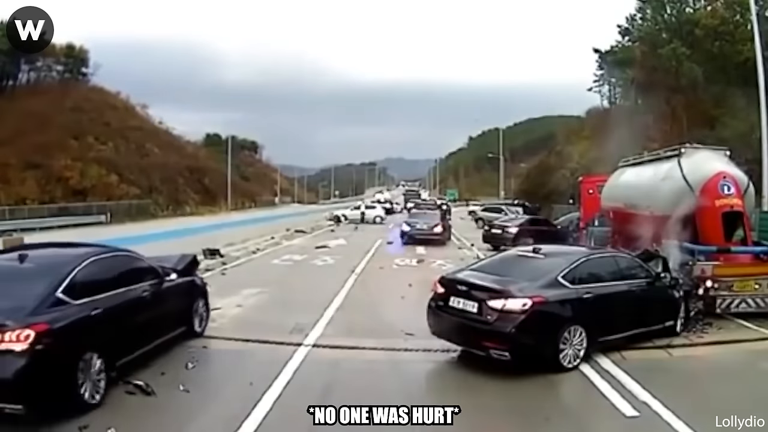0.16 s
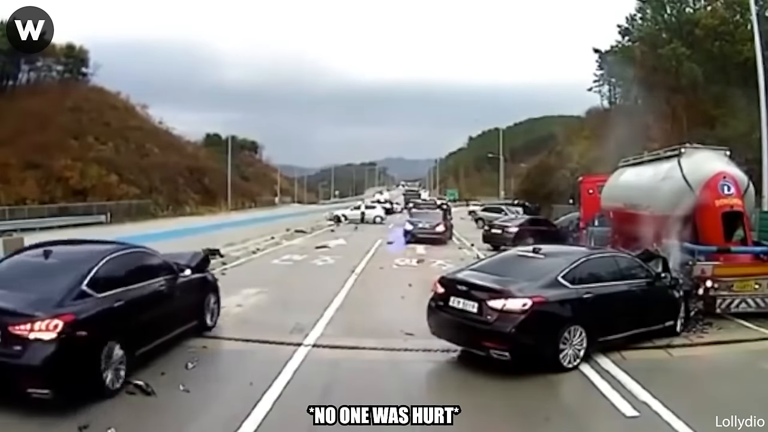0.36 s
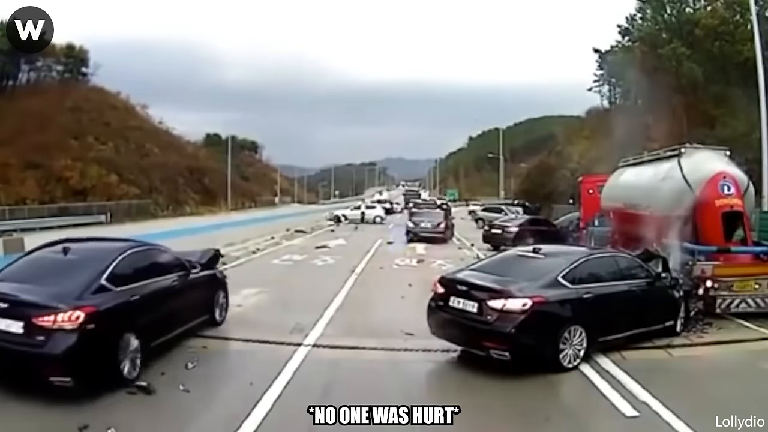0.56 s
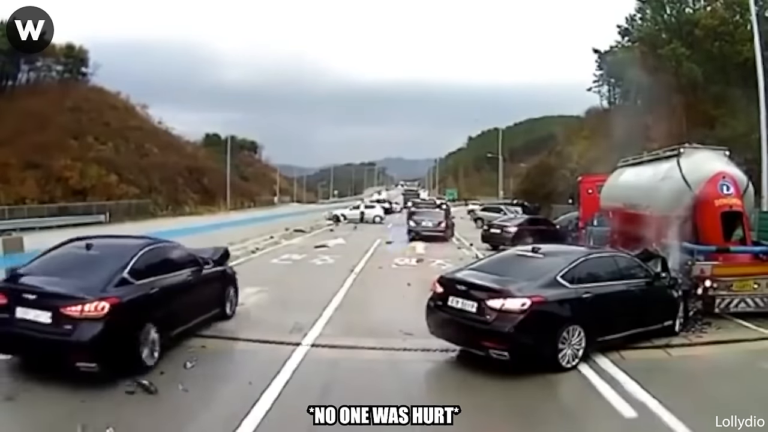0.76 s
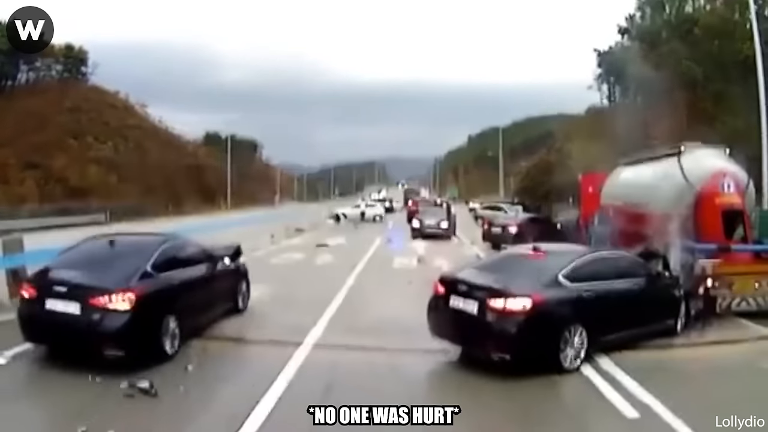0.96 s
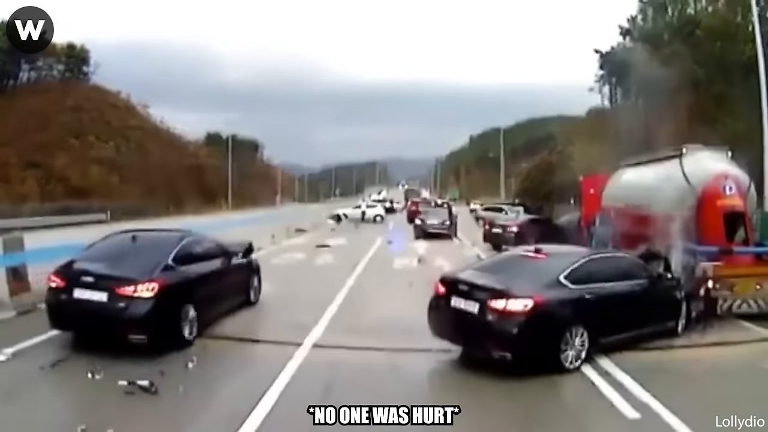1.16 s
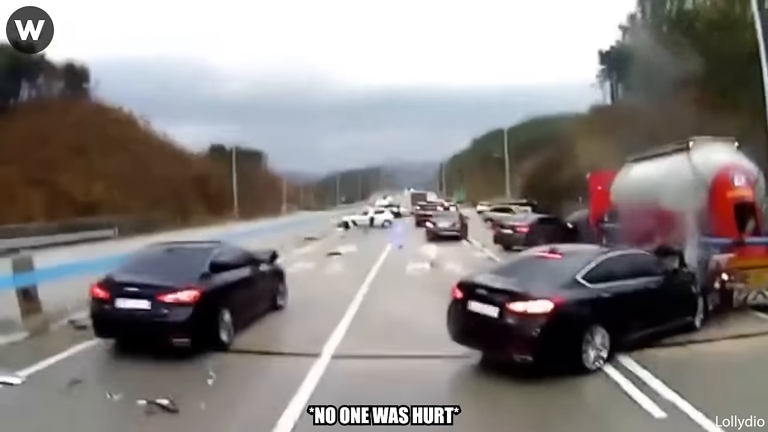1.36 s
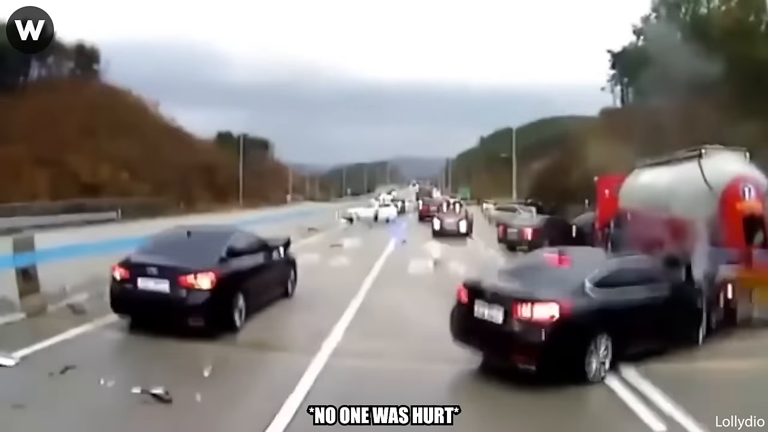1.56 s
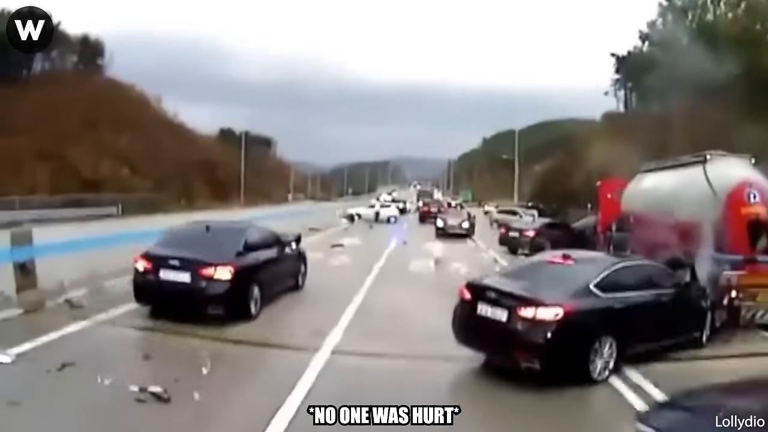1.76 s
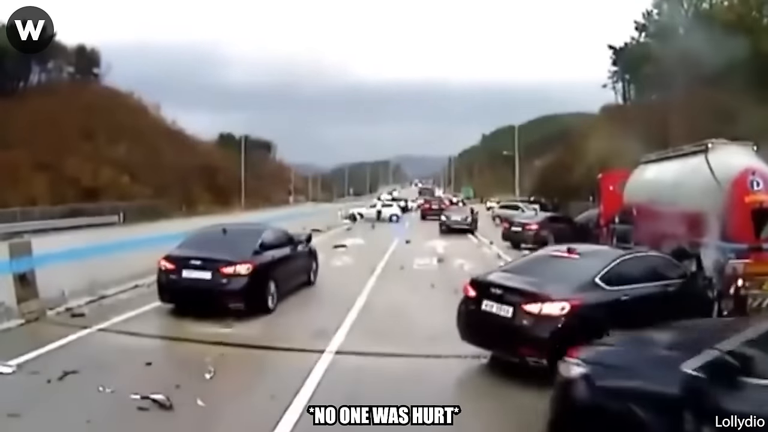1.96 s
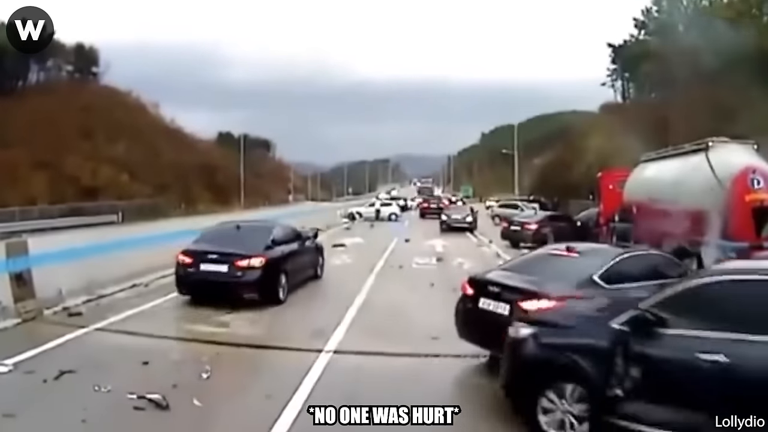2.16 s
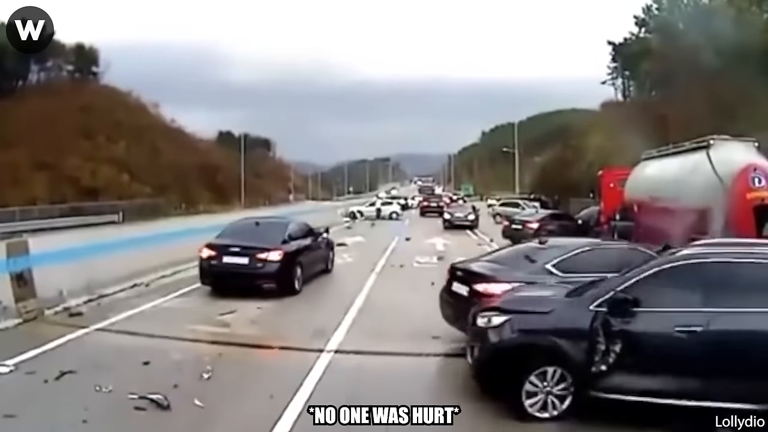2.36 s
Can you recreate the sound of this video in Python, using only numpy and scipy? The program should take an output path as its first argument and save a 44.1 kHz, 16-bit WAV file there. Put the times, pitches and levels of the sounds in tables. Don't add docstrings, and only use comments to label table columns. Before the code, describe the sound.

Loud tyre screech on an open highway, rough and unsteady with a low howl beneath, weakens before a sudden crash of booming body panels, breaking glass and ringing debris; close single microphone, faint ambience, short echoes.

```python
import sys
import numpy as np
from scipy import signal
from scipy.io import wavfile
from scipy.ndimage import uniform_filter1d

SR = 44100
rng = np.random.default_rng(int(sys.argv[2]) if len(sys.argv) > 2 else 0)


def convert_level_to_amplitude(level_db):
    exponent = np.asarray(level_db, float) / 20
    return 10 ** exponent


def dump_mix(stems):
    frames = np.atleast_2d(stems).T
    limited = np.clip(frames, -1, 1)
    pcm = np.round(limited * 32767).astype(np.int16)
    wavfile.write(sys.argv[1], SR, pcm)


N = 110250
T = np.arange(N) / SR

# (frequency [Hz], density [dB/Hz])
FLOOR_COLOUR = [(30, -2.5), (80, -20.5), (150, -24.5), (1000, -35.5), (7000, -40.5), (8500, -61),
                (14000, -50)]
FLOOR_DB = -52
# (frequency [Hz], level [dB], t60 [s])
TICK_MODES = [(3134, 1.5, 0.051), (3372, 0.5, 0.065), (1220, -11.5, 0.082), (5200, -10, 0.033),
              (10800, 2, 0.022)]
TICK_S, TICK_DB = .0474, -29.5
TICK_BOUNCE_S, TICK_BOUNCE_DB = .0038, -3.5
TICK_RATTLE_DB, TICK_RATTLE_T60_S = -56, .049
# (time [s], level [dB], brightness [dB/octave], rumble [dB])
SCRUB = [(.085, -39, -1, 0), (.11, -25, -2, 1), (.25, -23, 0.5, 2), (.38, -24, 0, 1), (.55, -22.5, 0, -1.5),
         (.83, -25.5, 2, 4.5), (1.05, -19.5, -2, 0), (1.12, -21, -2, -10), (1.3, -28.5, 0, 2.5),
         (1.5, -27, -1.5, -1), (1.58, -30, -3, -16), (1.64, -30, -12.5, 0.5), (1.7, -39, -10, 4)]
# (frequency [Hz], density [dB/Hz])
SCRUB_COLOUR = [(40, -15), (120, -1.5), (350, -5), (800, 4.5), (2200, -1), (4000, -6.5), (7400, -23.5),
                (8600, -44)]
# (time [s], slip rate [Hz], level [dB])
SQUEAL = [(.085, 857.6, -64), (.135, 947.3, -44), (.27, 1096, -22), (.3, 1119, -27), (.35, 1039, -26.5),
          (.39, 1030, -29.5), (.45, 1090, -23), (.53, 1059, -46), (.63, 983.6, -27.5), (.69, 930, -37),
          (.76, 970, -21.5), (.82, 980, -36), (.87, 984, -23.5), (.94, 930, -28), (1.0, 900, -29),
          (1.07, 884.5, -27), (1.12, 954, -25), (1.165, 810.6, -29), (1.2, 992, -25.5),
          (1.26, 949.6, -21.5), (1.31, 905, -28), (1.38, 930, -23), (1.44, 946.4, -26), (1.5, 888, -29),
          (1.55, 855, -23.5), (1.61, 840, -27), (1.645, 867, -39)]
# (time [s], pitch [Hz], level [dB])
SCREECH = [(.088, 1605, -43), (.1, 1639, -23.5), (.121, 1436, -21.5), (.129, 1950, -25), (.19, 1950, -29),
           (.25, 1854, -27.5), (.33, 1880, -35), (.39, 1684, -34), (.46, 1780, -26.5), (.49, 1870, -25.5),
           (.56, 1703, -35), (.61, 1770, -45), (.68, 1826, -32), (.77, 1890, -28.5), (.87, 1913, -29),
           (.97, 1843, -29), (1.03, 1772, -29), (1.1, 1710, -27), (1.15, 1769, -19), (1.2, 1797, -32),
           (1.26, 1851, -28), (1.34, 1798, -26), (1.42, 1800, -36.5), (1.48, 1742, -25.5),
           (1.54, 1821, -25.5), (1.6, 1780, -26), (1.64, 1790, -55)]
# (time [s], pitch [Hz], level [dB])
WHINE = [(.1, 2110, -50), (.15, 2147, -33), (.23, 2162, -26.5), (.28, 2315, -30), (.35, 2240, -38),
         (.45, 2177, -36), (.55, 2044, -39), (.62, 2080, -30), (.72, 2035, -28), (.77, 2001, -34),
         (.85, 2202, -19.5), (.89, 2074, -38), (.93, 2015, -27), (1.0, 1960, -36), (1.1, 1950, -31),
         (1.21, 2030, -26), (1.27, 1960, -29.5), (1.33, 2097, -22), (1.39, 2090, -30), (1.44, 2011, -22.5),
         (1.5, 1933, -28), (1.55, 1890, -30), (1.62, 1842, -42)]
# (time [s], pitch [Hz], level [dB])
HOWL = [(.089, 760, -36.5), (.105, 720, -17), (.125, 616.3, -18.5), (.24, 569.1, -19.5), (.37, 591.6, -18),
        (.405, 566, -28), (.52, 575, -28), (.58, 584, -19), (.70, 566.6, -24.5), (.84, 595, -20),
        (.88, 593.6, -30.5), (.95, 555, -27.5), (1.02, 510, -30), (1.17, 560, -40), (1.26, 559, -28),
        (1.37, 560.9, -28.5), (1.41, 544, -35), (1.58, 573, -37.5), (1.64, 571.7, -44.5)]
TAIL_DB_PER_S = 30
HOWL_BREAKS_S = .87
SETTLES_S = 1.3
# (from [s], to [s])
SPREAD = [
    (.09, 0.17),
    (.24, 1.49),
    (1.715, 2.6),
]
SPREAD_LOW_HZ, SPREAD_HIGH_HZ, SPREAD_DB = 4410, 7460, -2
# (delay [s], level [dB])
ECHOES = [(.019, -16.5), (.041, -13.5), (.083, -23)]
# (time [s], level [dB], brightness [dB/octave], rumble [dB])
CRUSH = [(1.713, -20.5, -1.5, -36), (1.76, -17.5, -1.5, -27), (1.82, -21, -1, -6), (1.832, -18, 2, -11),
         (1.92, -18, 1.5, 6), (2.0, -20, 2, 9), (2.1, -22, 1.5, 5), (2.17, -19.5, 0, 5),
         (2.3, -22, 2.5, 10), (2.5, -22, 0.5, 7)]
# (frequency [Hz], density [dB/Hz])
CRUSH_COLOUR = [(40, -29), (105, -13), (200, -3.5), (550, -3), (1200, -7), (2100, -10.5), (5700, -20),
                (10500, -37)]
CRUSH_ATTACK_S = .0015
# (frequency [Hz], level [dB], t60 [s])
PANELS = [(105, -6, 0.19), (180, 5, 0.1), (345, -5.5, 0.33), (724, -2, 0.096)]
PANEL_DB, BUCKLES_PER_S = -32, 700
# (time [s], frequency [Hz], peak [dB], t60 [s])
BOOMS = [(1.73, 184.6, -23, 0.14), (1.74, 367.5, -24, 0.13), (1.775, 388, -23, .2), (1.78, 233, -19, .15),
         (1.815, 467, -14, .1), (1.82, 705, -17, .1), (1.85, 180, -20.5, 0.14), (1.895, 277, -24, 0.1),
         (1.9, 424, -36, 0.057), (1.94, 183.4, -22, 0.1), (1.975, 830, -19.5, 0.17),
         (2.02, 196.7, -21.5, 0.12), (2.02, 345, -20.5, .1), (2.15, 240, -16, 0.099),
         (2.18, 318, -20.5, .2), (2.28, 210, -24, 0.12), (2.345, 203.7, -19, 0.17), (2.37, 398, -22.5, 0.2),
         (2.45, 330, -20, .15)]
# (time [s], level [dB])
SHATTER = [(1.715, -64.5), (1.81, -40.5), (1.835, -39.5), (1.92, -39), (2.0, -47), (2.09, -13.5),
           (2.14, -30), (2.32, -17), (2.4, -45), (2.5, -29)]
SHARDS_PER_S, SHARD_CYCLES = 1200, 150.0
# (time [s], pitch [Hz], peak [dB], t60 [s])
PIECES = [(1.85, 3780, -14, 0.056), (1.9, 2290, -16, 0.098), (1.975, 3390, -15.5, 0.086),
          (1.975, 2890, -14.5, 0.055), (2.005, 2840, -24, 0.052), (1.985, 5700, -18, .1),
          (2.012, 5713, -13.5, 0.044), (2.03, 2065, -18.5, 0.22), (2.065, 2064, -19, .07),
          (2.095, 6380, -22.5, 0.054), (2.175, 2682, -16, 0.065), (2.228, 2720, -16, 0.06),
          (2.246, 4900, -20, 0.079), (2.255, 2288, -22, .1), (2.28, 1984, -17, 0.064),
          (2.31, 1942, -17, 0.07), (2.318, 4930, -24, 0.18), (2.345, 3690, -21.5, 0.065),
          (2.4, 2280, -26, .07)]
SNAP_S, SNAP_DB = 2.117, -40
DEEP_HZ = 170
CUTOFF_HZ, AIR_DB, HISS_DB, SWAY_DB, DC_OFFSET = 10050, -19.5, -66.5, -51.5, .011


def rms_one(x):
    return x / np.sqrt(np.mean(x ** 2) + 1e-20)


def bandpass(x, low_hz, high_hz, order=2):
    return signal.sosfilt(signal.butter(order, [low_hz, high_hz], "band", fs=SR, output="sos"), x)


def in_time(rows):
    s, *columns = np.transpose(rows)
    return [np.interp(T, s, c) for c in columns]


def drift(rate_hz):
    r = np.exp(-16 * np.pi * rate_hz / SR)
    slow = signal.lfilter([1], [1, -2 * r, r * r], rng.standard_normal(N // 8 + 8002))
    slow = slow[8000:]
    return np.interp(np.arange(N) / 8, np.arange(len(slow)), rms_one(slow - slow.mean()))


def ring(push, hz, t60_s):
    r = convert_level_to_amplitude(-60 / (t60_s * SR))
    w = 2 * np.pi * hz / SR
    return signal.lfilter([0, np.sin(w)], [1, -2 * r * np.cos(w), r * r], push + 1e-18)


def clicks(per_s, uneven_db):
    size = convert_level_to_amplitude(uneven_db * np.minimum(rng.exponential(1, N), 5))
    sign = rng.choice([-1, 1], N)
    return size * sign * (rng.random(N) < per_s / SR)


def struck(rows, contact_s):
    out = 0
    for s, hz, peak_db, t60_s in rows:
        bump = np.exp(-((T - s - contact_s) / contact_s) ** 2)
        push = bump * np.sin(2 * np.pi * hz * T) * convert_level_to_amplitude(3 * rng.standard_normal(N))
        out = out + convert_level_to_amplitude(peak_db) * ring(2 * push / np.sum(np.abs(push)), hz, t60_s)
    return out


def banded_noise(colour, tilt_db, deep_db, patchy_db, shared_db):
    out, ref = 0, 0
    together = drift(8.3)
    edges_hz = 30 * 2 ** np.arange(0, 9, 1 / 3)
    white = rng.standard_normal((2, N))
    at_hz, density_db = np.transpose(colour)
    for k, (low, high) in enumerate(zip(edges_hz, edges_hz[1:])):
        hz = np.sqrt(low * high)
        band_db = np.interp(np.log(hz), np.log(at_hz), density_db) + patchy_db * drift(12.5)
        band = bandpass(white[k % 2], low, high) * convert_level_to_amplitude(band_db)
        shift_db = tilt_db * max(np.log2(hz / 1000), 0) + deep_db / (1 + (hz / DEEP_HZ) ** 4)
        out = out + band * convert_level_to_amplitude(shift_db)
        ref = ref + band
    return out * convert_level_to_amplitude(shared_db * together) / np.sqrt(np.mean(ref ** 2))


def stick_slip(hz, harmonics_db, wander, jitter, grip_db):
    slip_hz = hz * (1 + wander * drift(30) + jitter * drift(160))
    phase = 2 * np.pi * np.cumsum(slip_hz) / SR
    out = 0
    for k, db in enumerate(harmonics_db):
        out = out + convert_level_to_amplitude(db + grip_db * drift(70)) * np.sin((k + 1) * phase)
    return np.sqrt(2) * out


def sliding(rows):
    hz, db = in_time(rows)
    db = db - TAIL_DB_PER_S * np.maximum(T - rows[-1][0], 0)
    db = db - 1000 * np.maximum(rows[0][0] - T, 0)
    return hz, convert_level_to_amplitude(db - 2) * (T > TICK_S) * (T < CRUSH[0][0] + .05)


def roadside_floor():
    return convert_level_to_amplitude(FLOOR_DB) * banded_noise(FLOOR_COLOUR, 0, 0, patchy_db=.67, shared_db=.89)


def tick():
    hit = np.zeros(N)
    hit[int(TICK_S * SR)] = 1
    hit[int((TICK_S + TICK_BOUNCE_S) * SR)] = convert_level_to_amplitude(TICK_BOUNCE_DB)
    hit = np.convolve(hit, np.hanning(7) / 3)[:N]
    rattle_db = TICK_RATTLE_DB - 60 * np.abs(T - TICK_S) / TICK_RATTLE_T60_S
    rattle = convert_level_to_amplitude(rattle_db) * (T > TICK_S) * rms_one(bandpass(rng.standard_normal(N), 600, 4500))
    return rattle + sum(convert_level_to_amplitude(TICK_DB + db - .5) * ring(hit, hz, t60_s) for hz, db, t60_s in TICK_MODES)


def scrub():
    db, tilt_db, deep_db = in_time(SCRUB)
    noise = banded_noise(SCRUB_COLOUR, tilt_db, deep_db, patchy_db=1.2, shared_db=1.2)
    return convert_level_to_amplitude(db) * noise * (T > TICK_S)


def squeal():
    loose = np.where(T < SETTLES_S, 1, .45)
    hz, gain = sliding(SQUEAL)
    main = stick_slip(hz, [0, -9, -19], .016 * loose, .022 * loose, 4.5 * loose)
    beside = stick_slip(hz * .9, [-5, -10], .05, .02, 5)
    out = gain * (main + loose * beside)
    hz, gain = sliding(SCREECH)
    main = stick_slip(hz / 2, [-13, 0, -17, -25], .012 * loose, .017 * loose, 4.5)
    beside = stick_slip(hz * .465, [-16, -5, -22], .035, .018, 5)
    out = out + gain * (main + loose * beside)
    hz, gain = sliding(WHINE)
    return out + gain * stick_slip(hz / 2, [-14, 0, -18, -25], .015, .018, 5.5)


def howl():
    hz, gain = sliding(HOWL)
    jitter = np.where(T < HOWL_BREAKS_S, .028, .05)
    main = stick_slip(hz, [0, -19, -14, -22], .022, jitter, 3.8)
    rough = stick_slip(hz * 1.13, [-13, -22], .04, .04, 4)
    return gain * (main + rough)


def spread(mid):
    out = 0
    edges_hz = np.geomspace(SPREAD_LOW_HZ, SPREAD_HIGH_HZ, num=6)
    switched = sum(1.0 * (T > a) * (T < b) for a, b in SPREAD)
    for low, high in zip(edges_hz, edges_hz[1:]):
        band = signal.ellip(3, 1, 50, [low, high], "band", fs=SR, output="sos")
        level = np.sqrt(uniform_filter1d(signal.sosfilt(band, mid) ** 2, size=1500) + 1e-14)
        on = uniform_filter1d(switched * (drift(5) > -.8), size=900)
        out = out + level * on * rms_one(signal.sosfilt(band, rng.standard_normal(N)))
    return convert_level_to_amplitude(SPREAD_DB) * out


def roadside(x):
    dull = signal.lfilter([.4], [1, -.6], x)
    return x + sum(convert_level_to_amplitude(db) * np.interp(T - lag_s, T, dull, left=0) for lag_s, db in ECHOES)


def bodywork():
    db, tilt_db, deep_db = in_time(CRUSH)
    start = np.clip((T - CRUSH[0][0]) / CRUSH_ATTACK_S, 0, 1)
    noise = banded_noise(CRUSH_COLOUR, tilt_db, deep_db, patchy_db=1.4, shared_db=.8)
    roar = convert_level_to_amplitude(db) * noise * start
    boom = 0
    for hz, level_db, t60_s in PANELS:
        buckles = clicks(BUCKLES_PER_S, uneven_db=2.5) * start
        boom = boom + convert_level_to_amplitude(level_db) * ring(buckles, hz, t60_s)
    boom = boom / np.sqrt(np.mean(boom[int(1.75 * SR):] ** 2))
    return roar + struck(BOOMS, contact_s=.015) + convert_level_to_amplitude(PANEL_DB + db - CRUSH[0][1]) * boom


def glass():
    db, = in_time(SHATTER)
    hits = clicks(SHARDS_PER_S, uneven_db=2.4) * (T > SHATTER[0][0])
    dealt = rng.integers(0, 24, N)
    shards = 0
    for k, hz in enumerate(np.geomspace(2200, 8500, 24)):
        shards = shards + ring(hits * (dealt == k), hz, SHARD_CYCLES / hz)
    shards = shards / np.sqrt(np.mean(shards[int(1.75 * SR):] ** 2))
    return convert_level_to_amplitude(db - 13.5) * shards + convert_level_to_amplitude(-5.5) * struck(PIECES, contact_s=.0053)


def snap():
    return convert_level_to_amplitude(SNAP_DB) * (np.arange(N) == int(SNAP_S * SR))


def scene():
    echoing = roadside(howl() + squeal() + glass())
    mono = roadside_floor() + tick() + scrub() + echoing + bodywork()
    return np.array([mono, mono])


def top_cut(x):
    return signal.sosfilt(signal.butter(12, 15600, fs=SR, output="sos"), x)


def record(dry):
    mid = .76 * np.tanh(dry[0] / .8)
    low = signal.sosfilt(signal.ellip(8, .5, 60, CUTOFF_HZ, fs=SR, output="sos"), mid)
    hiss = convert_level_to_amplitude(HISS_DB + 2 * drift(15)) * rng.standard_normal(N)
    air = snap() + convert_level_to_amplitude(AIR_DB) * mid + hiss
    mid = low + bandpass(air, CUTOFF_HZ, 14200, order=4)
    side = spread(mid) + convert_level_to_amplitude(SWAY_DB) * drift(30)
    return top_cut(np.array([mid + side, mid - side]) + DC_OFFSET)


dry = scene()
out = record(dry)
dump_mix(out)
```